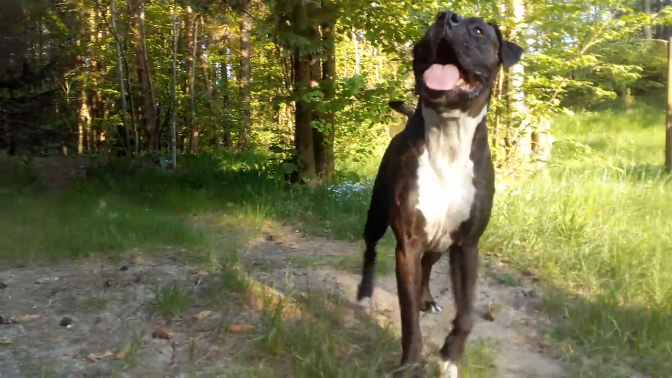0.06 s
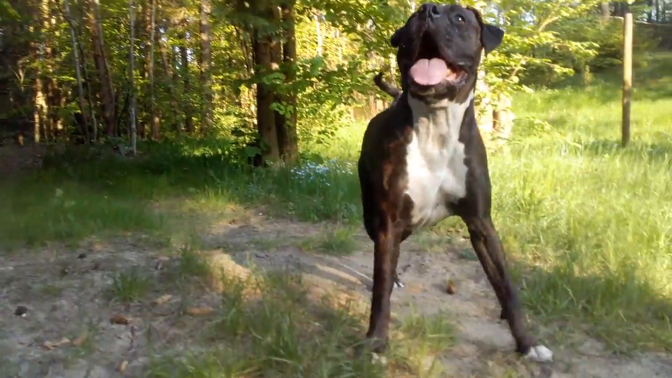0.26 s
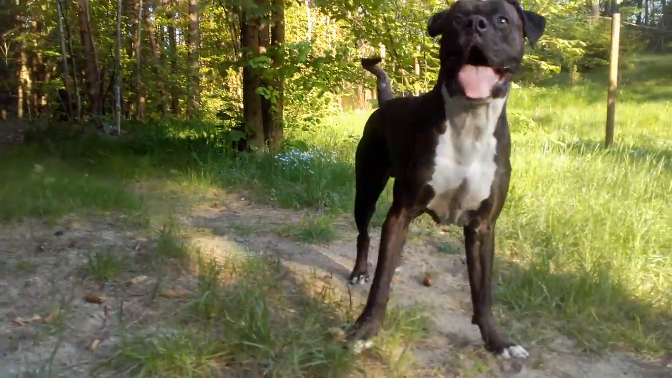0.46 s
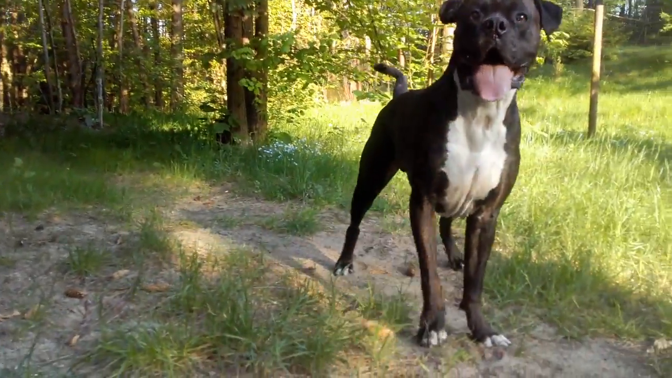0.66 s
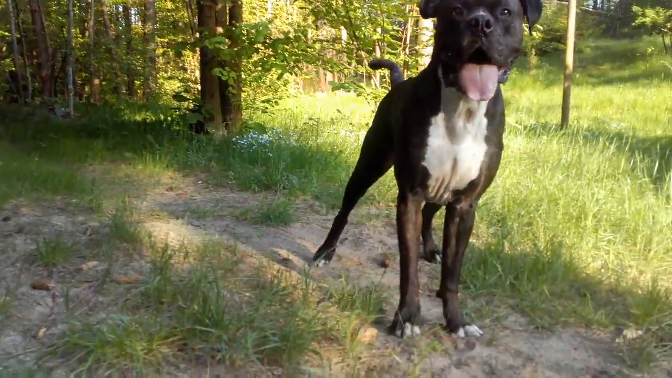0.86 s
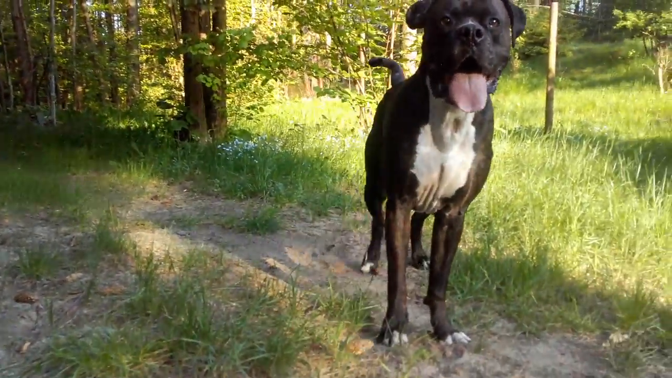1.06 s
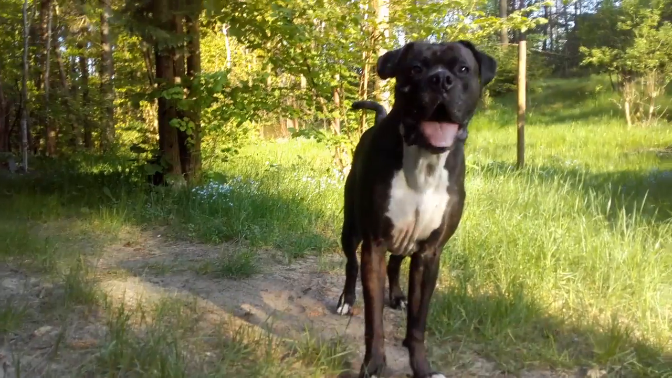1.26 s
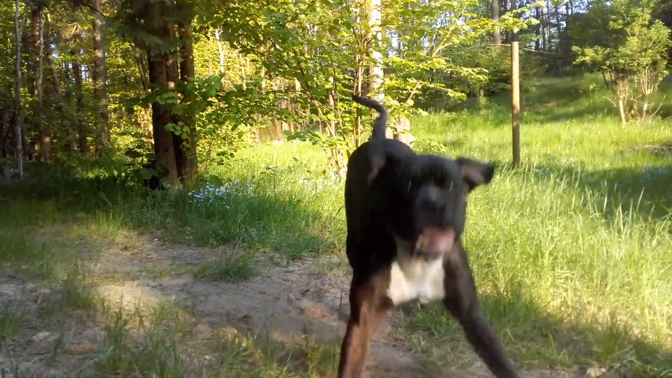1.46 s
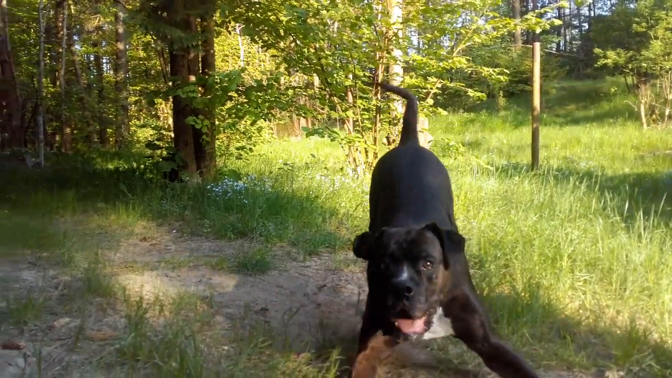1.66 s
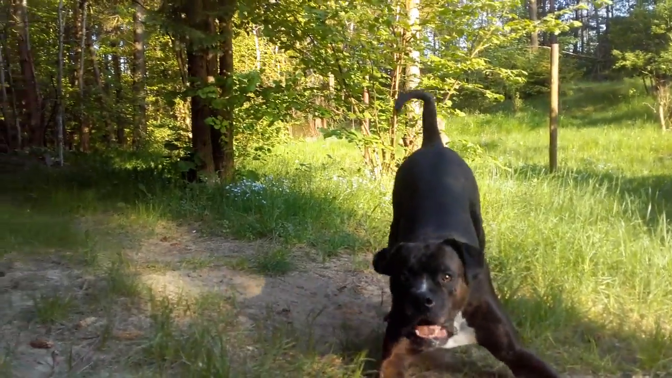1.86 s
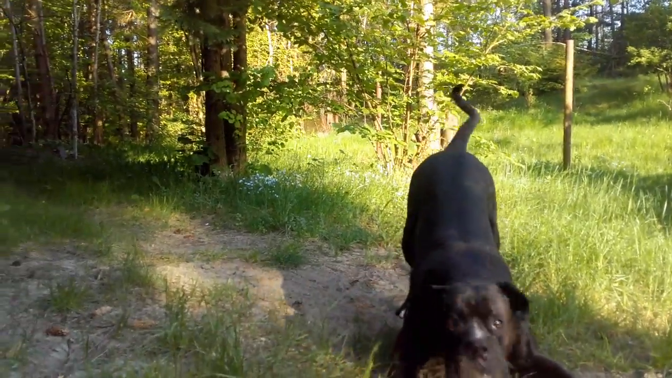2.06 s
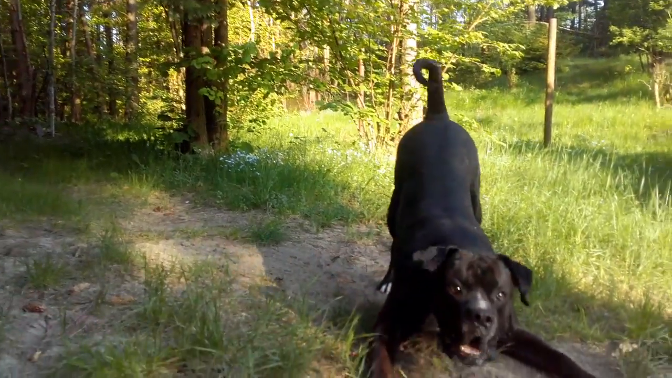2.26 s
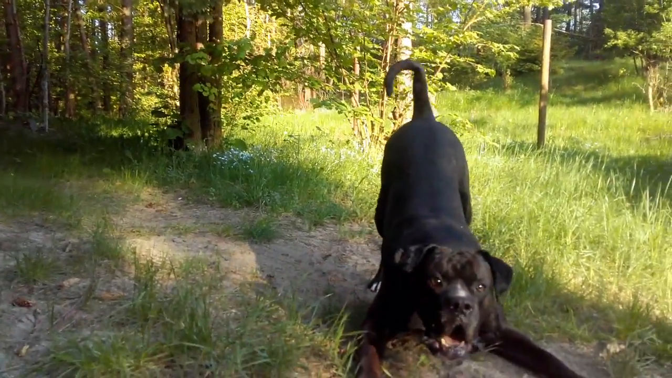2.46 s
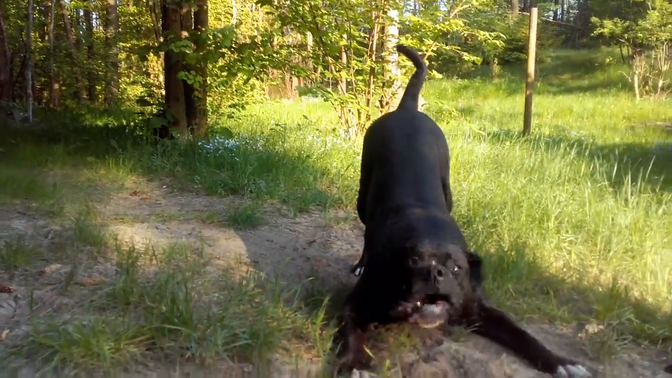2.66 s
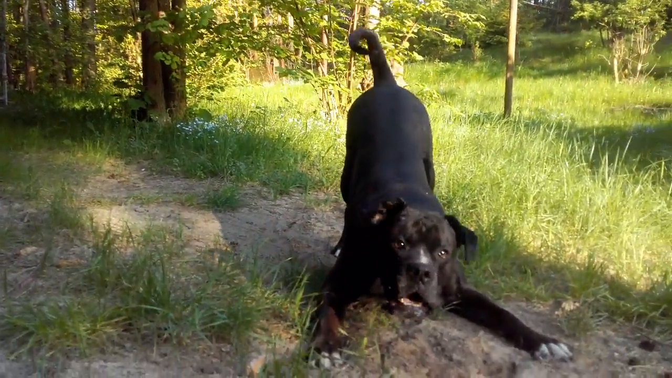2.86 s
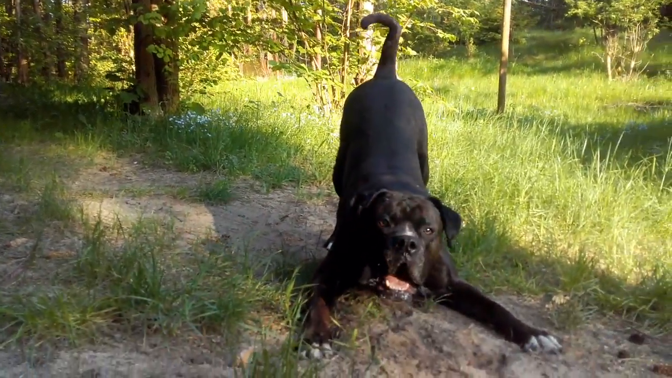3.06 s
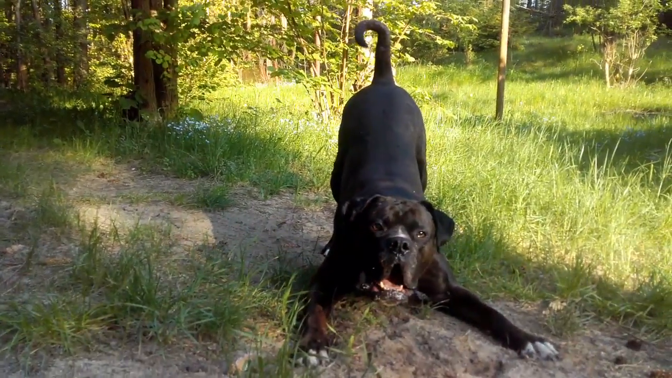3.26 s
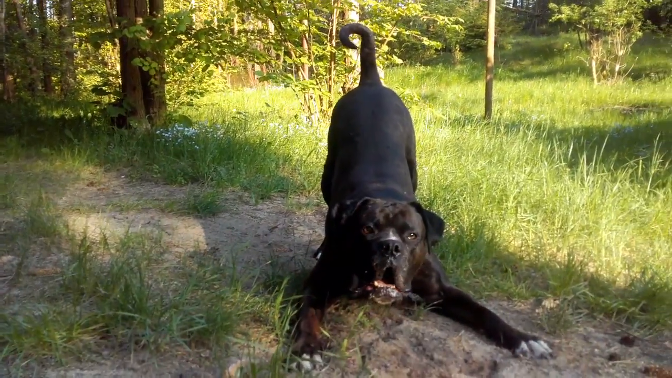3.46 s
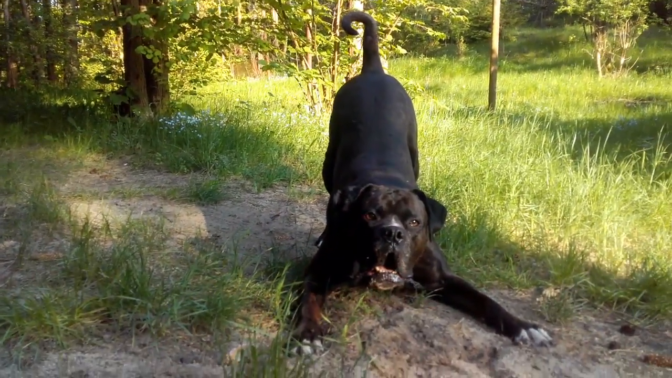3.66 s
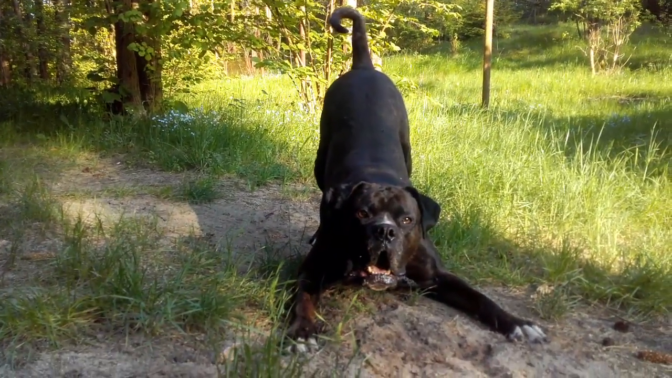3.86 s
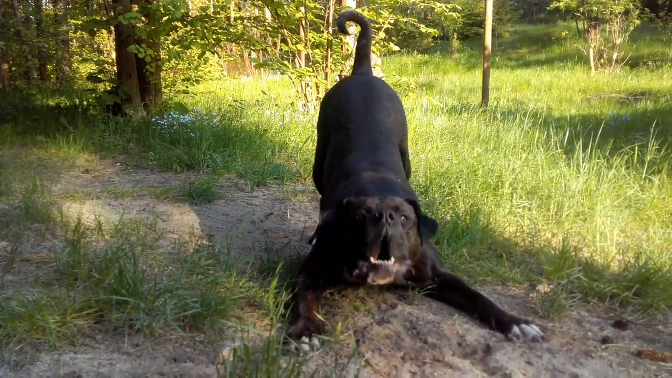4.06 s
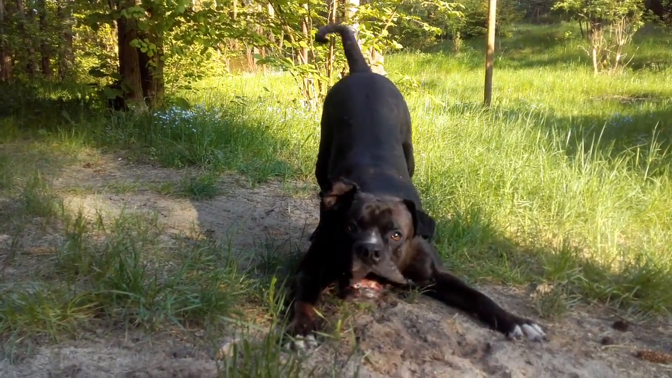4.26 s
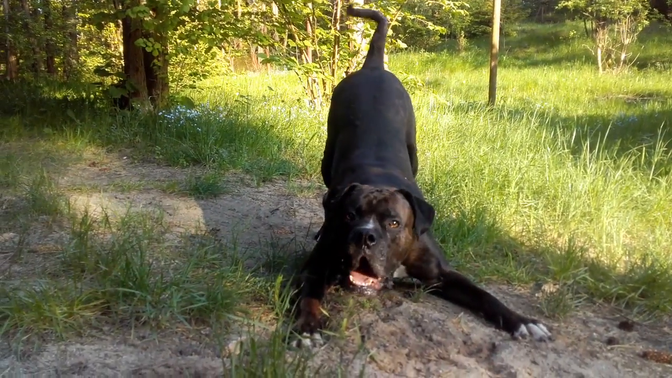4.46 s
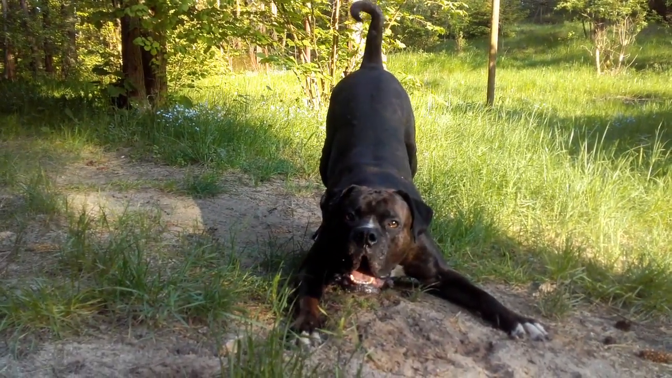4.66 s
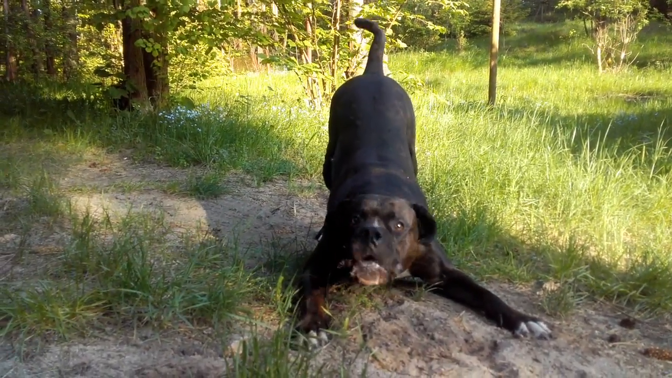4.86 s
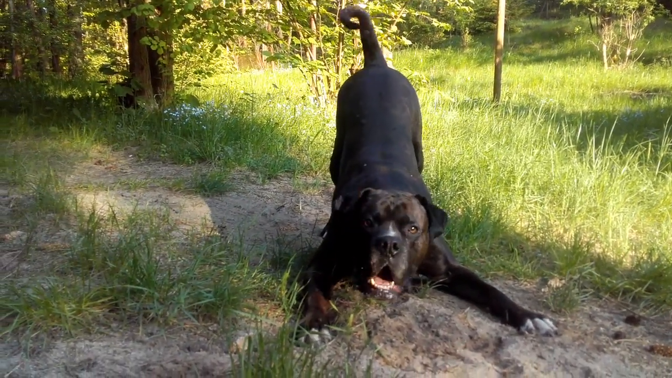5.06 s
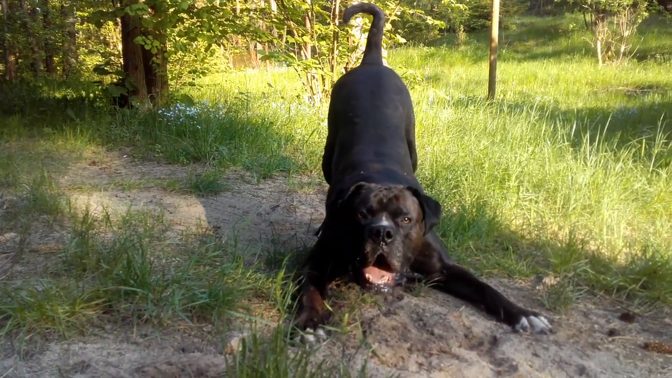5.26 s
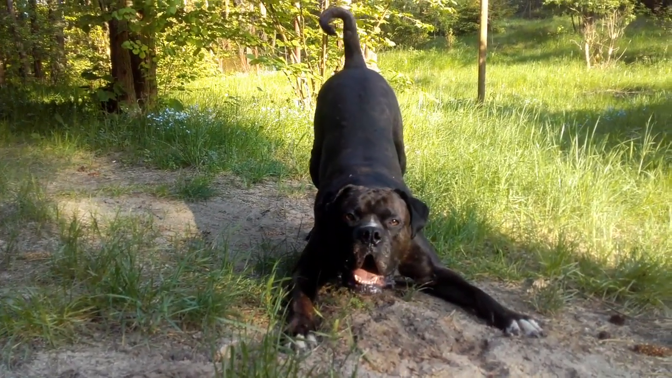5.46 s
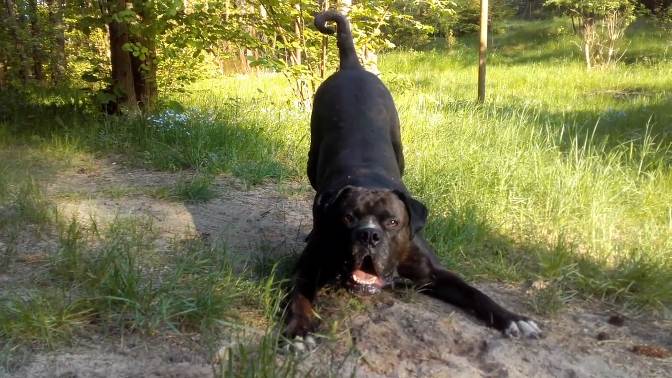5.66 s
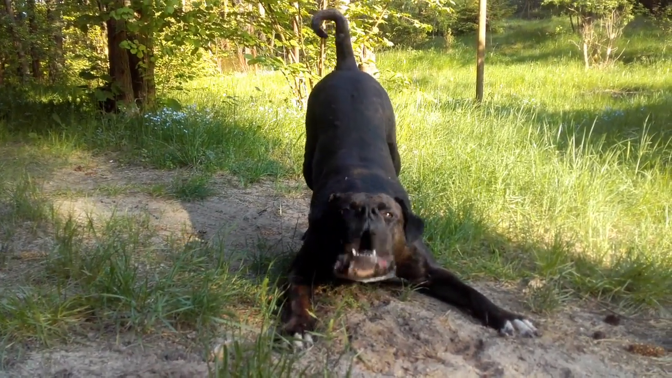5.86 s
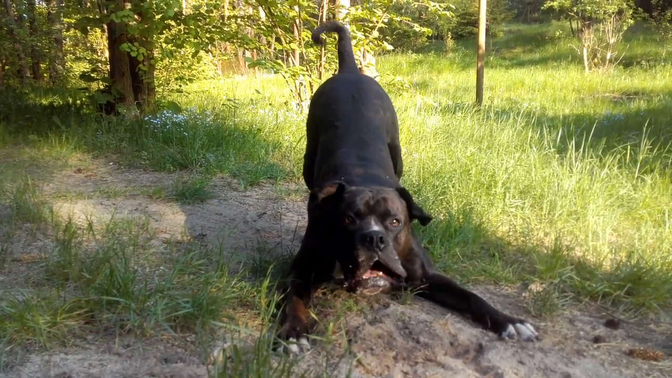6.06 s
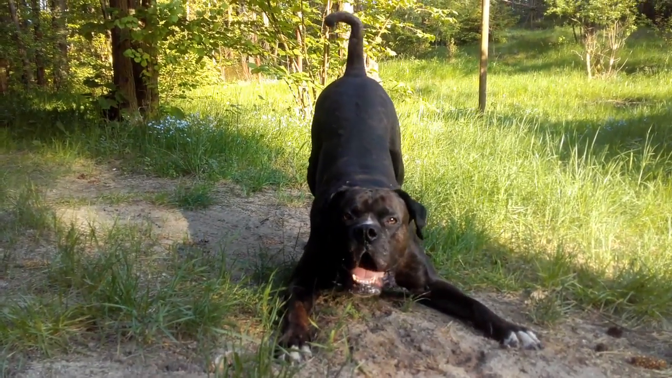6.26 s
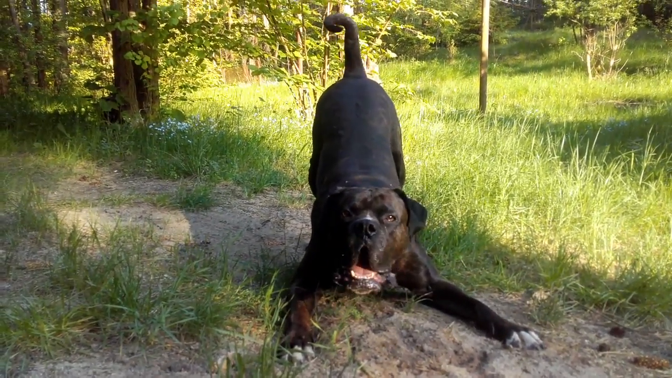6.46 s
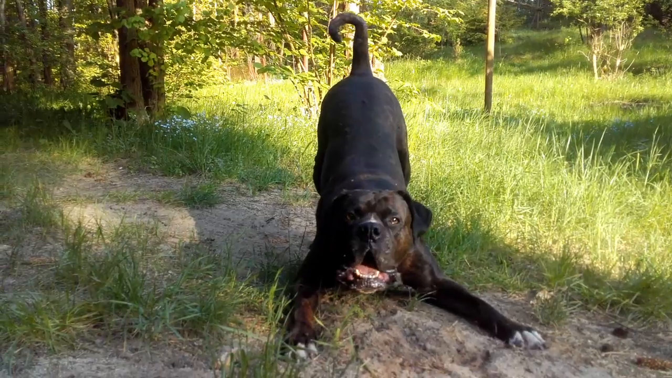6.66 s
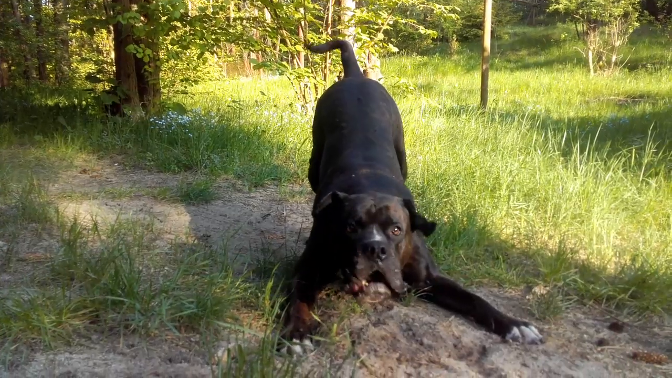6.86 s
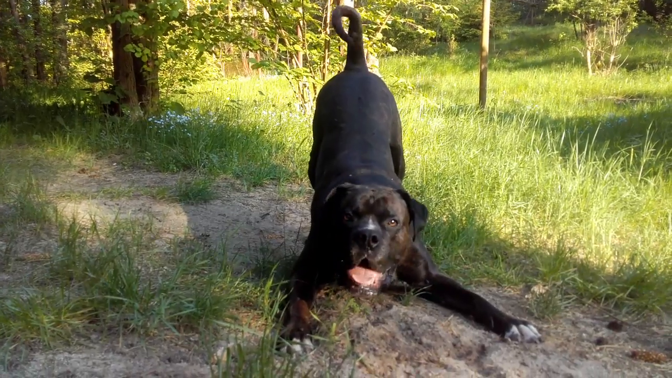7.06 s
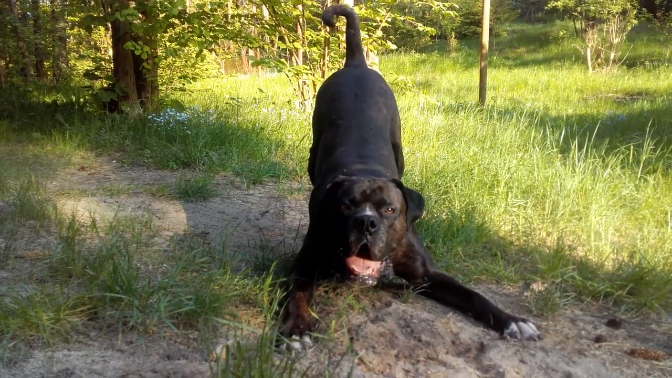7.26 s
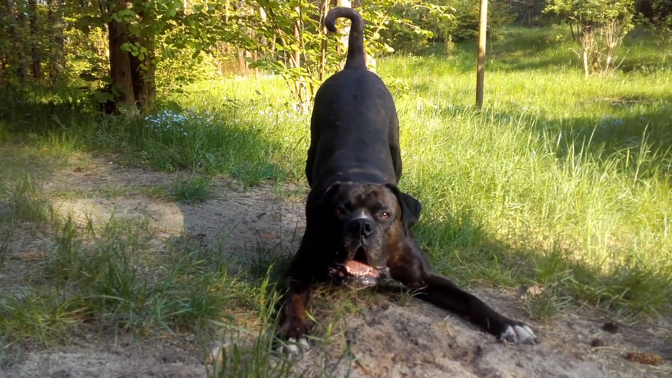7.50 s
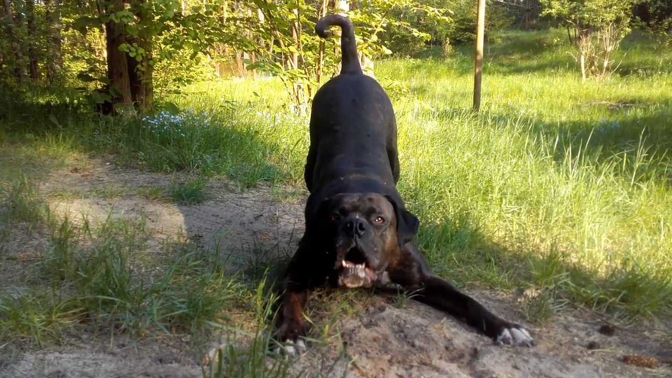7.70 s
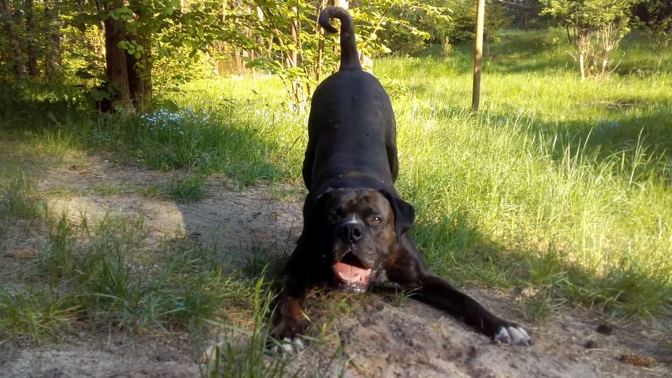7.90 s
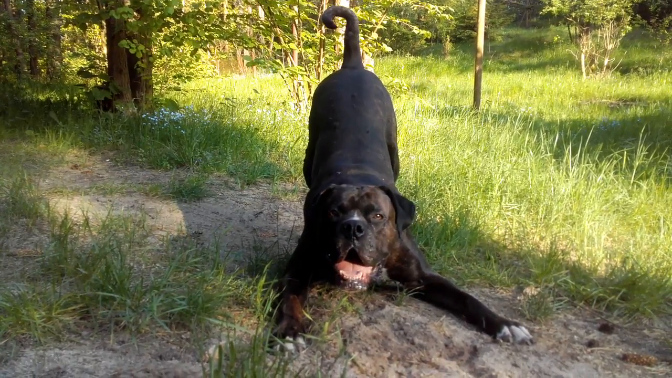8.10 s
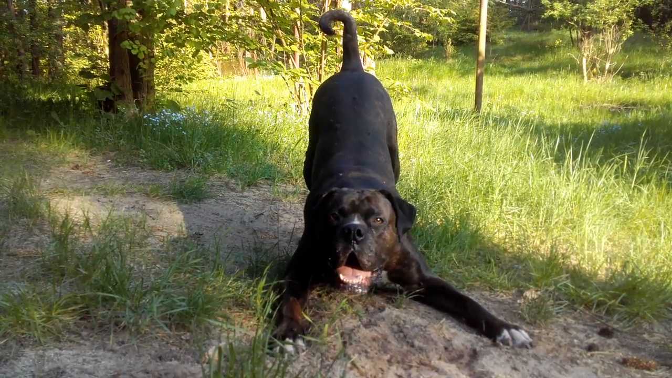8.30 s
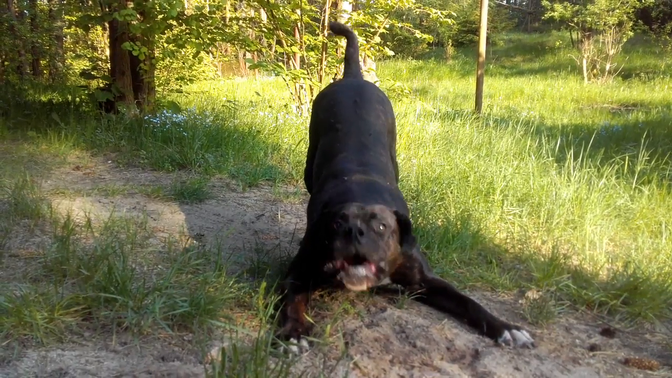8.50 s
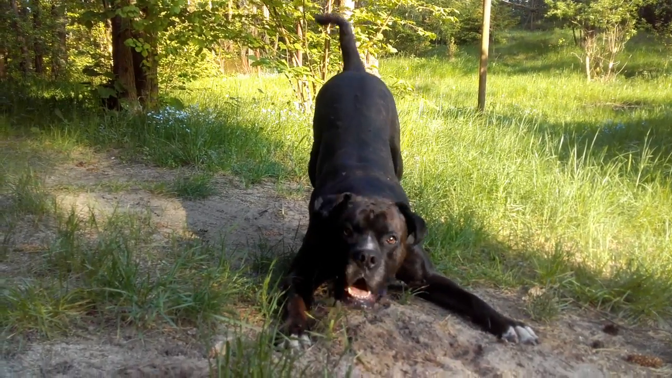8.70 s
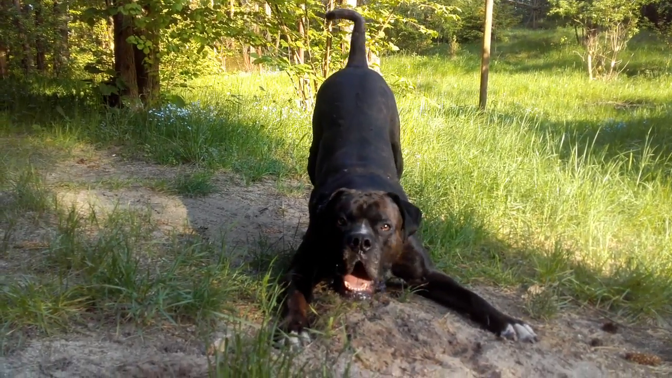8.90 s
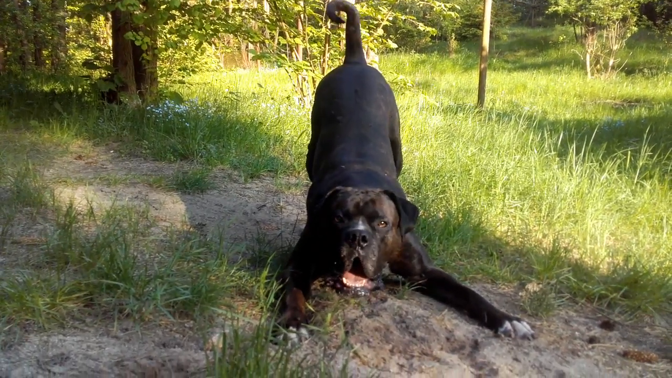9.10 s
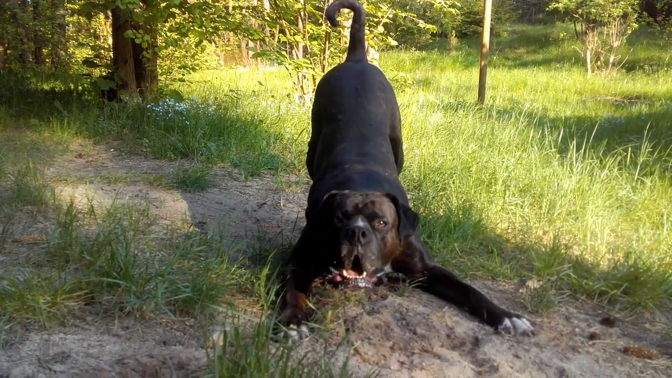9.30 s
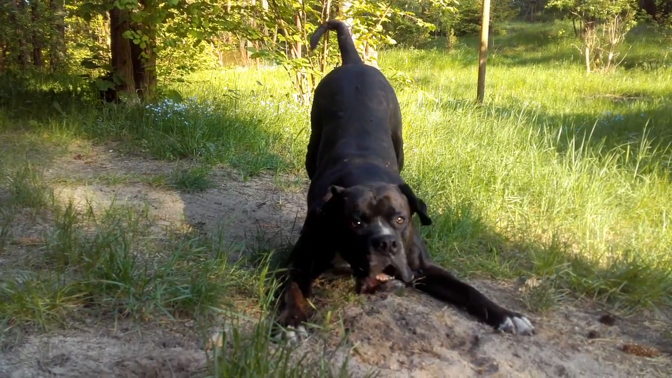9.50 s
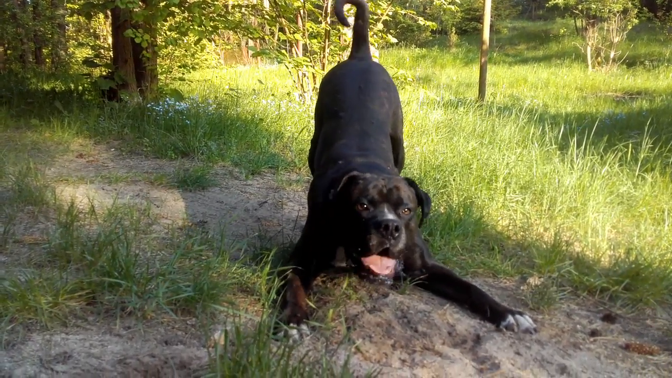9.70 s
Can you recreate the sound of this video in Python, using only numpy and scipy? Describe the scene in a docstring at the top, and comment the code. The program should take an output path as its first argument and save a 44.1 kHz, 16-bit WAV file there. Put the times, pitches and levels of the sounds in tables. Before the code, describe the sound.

A big dog pants softly three times close to the microphone while small birds whistle at a quiet forest edge. It lets out a growling woof, and its paws faintly skid and pat on sand. Eight loud, hoarse single barks follow at uneven intervals, with one lower woof late among them. Most barks start with a brief growl and end in a rush of breath, leaving a faint echo.

```python
"""A big dog barks close by at a forest edge, after panting and dropping onto its forelegs in the sand.
Most barks start as a growl; each breaks into a rough arch of pitch and ends in a rush of breath.
The voice is a source and a filter: vocal-fold pulses and turbulence excite the resonances of throat
and muzzle. Wet lips smack, small birds whistle over quiet air, and the trees return a faint echo."""
import sys
import numpy as np
from scipy import signal
from scipy.fft import rfft, irfft, next_fast_len
from scipy.io import wavfile
from scipy.ndimage import uniform_filter1d

SR = 44100
rng = np.random.default_rng(int(sys.argv[2]) if len(sys.argv) > 2 else 0)


def to_wav(s):
    """Save 16-bit WAV."""
    ch = np.atleast_2d(s).T  # columns
    pcm = np.round(np.clip(ch, -1, 1) * 32767)  # PCM
    wavfile.write(sys.argv[1], SR, pcm.astype(np.int16))


N = 429534
TIME = np.arange(N) / SR


def from_db(db):
    """Amplitude ratio of a level in decibels."""
    return 10 ** (np.asarray(db) / 20)


def rms_one(x):
    """Normalisation to unit power."""
    return x / np.sqrt(np.mean(x ** 2) + 1e-20)


def in_time(rows):
    """Linear interpolation of (time, values...) rows: one curve per value."""
    times, *columns = np.transpose(rows)
    return [np.interp(TIME, times, column) for column in columns]


def during(start, length):
    """Rectangular window: the samples of an event and its age at each."""
    on = (TIME >= start) & (TIME < start + length)
    return on, TIME[on] - start


def soften(levels, size=220):
    """Triangular smoothing: two moving averages of `size` samples."""
    return uniform_filter1d(uniform_filter1d(levels, size), size)


def hump(age, centre_s, half_width_s):
    """Gaussian bell of height one."""
    return np.exp(-((age - centre_s) / half_width_s) ** 2)


def puffs(events, rise_s):
    """Superposed envelopes of soft contacts: linear rise, exponential decay."""
    starts, peak_db = np.transpose(events)
    ages = np.clip((TIME - starts[:, None]) / rise_s, 0, 50)
    return from_db(peak_db) @ (ages * np.exp(1 - ages))


def band(x, hz, kind="band", order=4):
    """Butterworth filter, flat in its passband."""
    return signal.sosfilt(signal.butter(order, np.clip(hz, 10, .45 * SR), kind, fs=SR, output="sos"), x)


def noise():
    """White Gaussian noise."""
    return rng.standard_normal(N)


def drift(rate_hz):
    """Random modulation: low-passed noise of unit power."""
    return rms_one(band(noise(), rate_hz, "low", order=2))


def coloured(spectrum):
    """Spectral shaping: noise of unit power that follows (frequency, level) rows."""
    hz, db = np.transpose(spectrum)
    size = next_fast_len(N)
    shape = from_db(np.interp(np.log(np.fft.rfftfreq(size, 1 / SR) + 1), np.log(hz), db))
    return rms_one(irfft(rfft(noise(), size) * shape, size)[:N])


def resonate(x, modes):
    """Parallel resonances, each (frequency [Hz], bandwidth [Hz], gain [dB])."""
    return sum(from_db(db) * band(x, [hz - width / 2, hz + width / 2], order=2 if hz < 1000 else 3)
               for hz, width, db in modes)


def moving_resonance(hz, half_width_hz):
    """Narrowband noise: air ringing in a cavity whose tuning moves."""
    phase = 2 * np.pi * np.cumsum(hz) / SR
    return drift(half_width_hz) * np.sin(phase) + drift(half_width_hz) * np.cos(phase)


def thin(x, share, edge_hz):
    """Cancellation: subtracting a share of the bass, in phase, weakens it."""
    bass = signal.sosfiltfilt(signal.butter(4, edge_hz, fs=SR, output="sos"), x)
    return x - np.clip(share, 0, 1) * bass


def articulate(x, edges_hz, levels, even_s):
    """The mouth as a time-varying filter: each band is evened out, then given its own envelope."""
    out = 0
    for low, high, level in zip(edges_hz, edges_hz[1:], levels):
        part = band(x, [low, high], order=5)
        power = soften(part ** 2, int(even_s * SR))
        out = out + level * part / np.sqrt(np.abs(power) + 1e-12)
    return out


# Spectrum of the air: (frequency [Hz], relative level [dB])
AIR_SPECTRUM = [(18, -50), (30, -6), (164, -6), (256, -4.5), (332, -4), (420, -1.5), (945, -5), (1080, -6),
                (1230, -5), (3490, -18), (4420, -24.5), (5170, -27.5), (15500, -51.5)]
# Its rise and fall: (time [s], relative level [dB])
AIR_LEVELS = [(0, -53.5), (.7, -58.5), (1.25, -59.5), (2.5, -56.5), (3.3, -64), (3.9, -64.5), (4.6, -56.5),
              (5.6, -65), (6.5, -60.5), (7.3, -63), (8.3, -64), (9.25, -69), (9.74, -65.5)]


def air():
    """Ambient noise: a dark hush under slow amplitude modulation."""
    air_db, = in_time(AIR_LEVELS)
    return from_db(air_db - 4.5) * band(coloured(AIR_SPECTRUM), 64, "high", order=1)


# Bird notes: (start [s], length [s], first pitch [Hz], middle pitch [Hz], last pitch [Hz],
# level [dB], warble depth [Hz])
BIRD_NOTES = [(-.03, .17, 2305, 2206, 2276, -44.5, 64), (0.091, 0.042, 2400, 2730, 2500, -55, 130),
              (.15, 0.12, 2230, 2140, 2245, -57.5, 44), (0.273, 0.096, 2830, 3007, 3200, -53.5, 83),
              (0.329, 0.15, 3400, 3570, 3430, -62.5, 190), (0.381, 0.13, 3205, 2895, 2390, -49.5, 45),
              (0.515, 0.052, 7700, 7600, 7544, -83.5, 160), (0.974, .13, 3600, 3420, 3660, -69.5, 67),
              (3.018, 0.16, 3640, 3577, 3570, -76, 110), (3.218, 0.22, 4560, 4520, 4480, -77.5, 20),
              (3.721, 0.37, 4540, 4446, 4425, -75, 29), (4.423, 0.2, 2270, 2227, 2165, -48.5, 80),
              (4.456, 0.13, 3700, 3660, 3350, -68.5, 180), (4.682, 0.13, 2560, 2596, 2534, -51, 5.4),
              (4.81, .06, 1924, 1867, 1890, -51.5, 25), (5.081, 0.16, 2297, 2243, 2244, -48.5, 64),
              (5.223, 0.08, 2535, 2570, 2584, -46.5, 29), (5.384, 0.11, 2600, 2620, 2540, -63, 75),
              (5.546, 0.063, 1843, 1880, 2080, -51.5, 45), (5.631, .12, 2350, 2084, 2046, -52, 130),
              (5.831, 0.088, 3980, 3743, 3311, -69.5, 210), (6.032, 0.12, 3280, 3330, 3280, -56, 57.4),
              (6.253, 0.099, 7100, 6940, 7000, -76.5, 110), (6.396, 0.32, 3306, 3390, 3450, -74, 141),
              (7.269, 0.16, 2240, 2283, 2182, -66, 10.3), (7.474, 0.16, 3530, 3470, 3600, -76.5, 140),
              (8.828, .14, 3550, 3520, 3520, -71.5, 180)]


def birds():
    """Frequency modulation: each whistle is a pure tone that glides and warbles."""
    out, warble = np.zeros(N), drift(110)
    for start, length, *glide_hz, db, warble_hz in BIRD_NOTES:
        on, age = during(start, length)
        hz = np.interp(age / length, [0, .5, 1], glide_hz) + warble_hz * warble[on]
        envelope = from_db(db) * np.sqrt(np.abs(np.sin(np.pi * age / length)))
        out[on] += envelope * np.sin(2 * np.pi * np.cumsum(hz) / SR)
    return out


def forest(x, t60, dull_hz):
    """Reverberation by scattering: countless trunks spread a sound into a dull, decaying tail."""
    t = TIME[:2 * SR]
    scatter = rng.standard_normal(len(t)) * from_db(-60 * t / t60) * (1 - np.exp(-t / .0044))
    response = band(scatter / np.linalg.norm(scatter), dull_hz, "low", order=1)
    return signal.fftconvolve(x, response)[:N]


TAIL_S = .22   # time allowed for the fading tail
# Pants: (start [s], length [s], level [dB])
PANTS = [(-.01, 0.037, -44.5), (0.362, 0.13, -42), (0.816, 0.13, -49)]
# Their spectrum: (frequency [Hz], relative level [dB])
PANT_SPECTRUM = [(150, -59), (250, -50), (421, -21), (501, 1.5), (731, -12.5), (833, 2), (1020, -11),
                 (1340, -0.5), (1750, -17), (2080, -6.5), (2300, -12.5), (2900, -21.5), (4290, -46),
                 (8000, -55), (10400, -89), (17600, -120)]


def panting():
    """Flow noise: breath flutters over the tongue; each pant starts at once, sags and dies."""
    attack_s, sag_db_per_s, release_db_per_s = .008, 23.5, 294.5
    level = np.zeros(N)
    for start, length, db in PANTS:
        on, age = during(start, 2 * length + TAIL_S)
        fall_db = sag_db_per_s * age + release_db_per_s * np.maximum(age - length, 0)
        level[on] += np.minimum(age / attack_s, 1) * from_db(db - fall_db)
    return level * coloured(PANT_SPECTRUM) * from_db(1.1 * drift(60))


# Echo paths: (delay [s], gain [dB])
ECHOES = [(.034, -29.5), (.071, -31), (.118, -36)]


def tree_echoes(x):
    """Early reflections: the nearest trees return delayed, duller copies."""
    echoes = sum(from_db(db) * np.interp(TIME - delay, TIME, x, left=0) for delay, db in ECHOES)
    return band(echoes, 3500, "low", order=1)


def folds(pitch_hz, jitter, shimmer_db, breath, odd_db):
    """Glottal source: uneven closures, strong and weak in turn, with a puff of air in each cycle."""
    cycles = np.cumsum(pitch_hz * np.exp(jitter * drift(170))) / SR
    count = np.floor(cycles)
    # odd_db parts alternate pulses and also lowers them all against the breath
    size = from_db(shimmer_db * drift(320) + odd_db * (count % 2 - 5.5))
    pulses = np.diff(count, prepend=0) * size * np.sqrt(SR / pitch_hz)
    airflow = rms_one(np.exp(-3 * (cycles - count)) * noise())
    return pulses + breath * band(airflow, 490, "high", order=1)


# Formants of the slack throat and muzzle: (frequency [Hz], bandwidth [Hz], gain [dB])
SLACK_FORMANTS = [(175, 130, -8), (505, 230, 3), (860, 360, -1.5), (1157, 350, -16), (1719, 160, -11.5),
                  (1855, 180, -12.5), (2214, 170, -14.5), (2915, 810, -37.5), (4420, 600, -30),
                  (5400, 620, -31.5), (6500, 360, -39.5), (9600, 1200, -43), (13500, 3400, -54.5)]
# Growls, leading into a bark or alone as a woof: (start [s], swell time [s], sag time [s], swell [dB],
# then relative peak band levels: throat [dB], jaw [dB], mouth [dB], teeth hiss [dB])
GROWLS = [ (1.336, .01, .02, 7.5, -63.5, -49, -53.5, -82), (1.401, .076, .032, 29, -11.5, -17, -28, -53),
          (2.002, 0.071, 0.0056, 22.5, -19, -30.5, -36, -62),
          (4.096, .043, .003, 19, -23, -39.5, -49.5, -65.5),
          (4.866, 0.026, 0.0038, 12.5, -24.5, -39, -42, -71.5),
          (5.906, 0.036, .003, 11, -31.5, -52.5, -51, -67),
          (6.743, 0.033, 0.025, 17.5, -29.5, -47.5, -49.5, -75),
          (7.554, .18, .05, 28.5, -23.5, -57.5, -39.5, -72),
          (8.462, 0.079, 0.0025, 16.5, -28.5, -48, -50, -75),
          (9.296, 0.13, 0.0026, 25.5, -26.5, -43, -54, -94)]
# Share of the swell and sag in each band: (throat, jaw, mouth, teeth hiss) [ratio]
GROWL_SHARES = [1.0, 0.99, 1, .65]


def growls():
    """Pulse phonation: slack folds flap slowly, faster as the growl swells, and ring the formants."""
    slack_hz, tense_hz, sag_db_per_s = 58.1, 92, 170.5
    flaps, levels = [], np.zeros((len(GROWL_SHARES), N))
    for start, swell_s, sag_s, swell_db, *peak_db in GROWLS:
        flaps += [(start, slack_hz), (start + swell_s, tense_hz)]
        on, age = during(start, swell_s + sag_s)
        below_db = swell_db * np.maximum(1 - age / swell_s, 0)
        below_db += sag_db_per_s * np.maximum(age - swell_s, 0)
        levels[:, on] = from_db(np.c_[peak_db] - np.c_[GROWL_SHARES] * below_db)
    flap_hz, = in_time(flaps)
    throat, jaw, mouth, hiss = soften(levels)
    source = folds(flap_hz, jitter=.24, shimmer_db=3, breath=.45, odd_db=1.5)
    source = band(source, 2000, "low", order=2) + .66 * band(noise(), 1900, "high", order=2)
    # the chest tone goes as the jaw opens
    voice = thin(resonate(source, SLACK_FORMANTS), 1.7 * jaw / (throat + 1e-9), edge_hz=500)
    edges_hz = [110, 600, 1000, 1500, 3600, 15500]
    gains = [throat, jaw, from_db(-11) * jaw, mouth, hiss]
    return from_db(-4) * articulate(voice, edges_hz, gains, even_s=.05)


# Notches of the muzzle: (frequency [Hz], bandwidth [Hz], share removed [0-1])
ANTIRESONANCES = [(1417, 98, 0.4), (2480, 300, 0.4), (3590, 740, 0.7), (7600, 810, 0.4), (11600, 2000, 0.3)]


def muzzle(x):
    """Antiresonance: side cavities cut valleys into the spectrum of the voice."""
    for hz, width_hz, share in ANTIRESONANCES:
        x = x - share * band(x, [hz - width_hz / 2, hz + width_hz / 2], order=1)
    return x


# Forepaws skidding through sand: (time [s], level [dB])
SKID = [(1.45, -75.5), (1.466, -76), (1.5, -65), (1.624, -55), (1.662, -70), (1.72, -77)]
# Paws patting the ground: (time [s], relative peak level [dB])
PATS = [(1.735, -50), (1.772, -53.5), (1.803, -40.5), (1.86, -45), (1.92, -44)]


def paws():
    """Friction and impact: sand grains crackle under the skid, then the dog settles with soft pats."""
    skid_db, = in_time(SKID)
    skid = soften(from_db(skid_db) * (TIME >= SKID[0][0]) * (TIME <= SKID[-1][0]))
    sand = rms_one(band(noise() * from_db(4 * drift(900)), [5500, 13000], order=2))
    earth = rms_one(resonate(noise(), [(330, 270, -1.5), (1490, 300, -11)]))
    return skid * sand + from_db(-9) * puffs(PATS, rise_s=.012) * earth


# Air after each utterance: (start [s], length [s], hold [s], fall [dB],
# then relative band levels: throat [dB], jaw [dB], mouth [dB], teeth hiss [dB])
BREATHS = [ (1.508, 0.15, 0.081, 26, -35, -29, -31, -45), (2.219, .15, .01, 25, -30, -35.5, -38, -49.5),
           (2.884, 0.15, .005, 23, -39, -41.5, -43, -57), (4.315, 0.14, 0.026, 21, -34.5, -41.5, -38, -52),
           (5.062, 0.18, 0.0052, 26.5, -34.5, -43.5, -39, -55),
           (6.114, 0.17, 0.013, 25, -35.5, -45.5, -38.5, -56),
           (6.969, 0.17, 0.0081, 26, -35.5, -44, -39.5, -55),
           (7.767, 0.18, 0.035, 23, -42.5, -52.5, -43.5, -67),
           (8.698, .15, 0.0032, 25, -32.5, -41.5, -38.5, -53),
           (9.57, 0.15, 0.0067, 25.5, -35, -45.5, -41.5, -58.5)]
# Shape of the fall, 1 = even, more = late: (throat, jaw, mouth, teeth hiss) [exponent]
BREATH_BENDS = [1.5, 0.61, 1.1, 1.0]


def breaths():
    """Turbulence through formants: air rushes out, then the forest's echo lingers and fades."""
    first_hz, last_hz = 490, 730   # a resonance rises as the throat relaxes
    echo_fade_db_per_s = 61.5
    rises, levels = [], np.zeros((len(BREATH_BENDS), N))
    for start, length, hold_s, fall_db, *start_db in BREATHS:
        rises += [(start, first_hz), (start + length, last_hz)]
        on, age = during(start, length + TAIL_S)
        fallen = np.clip((age - hold_s) / (length - hold_s), 0, 1) ** np.c_[BREATH_BENDS]
        echo_fade_db = echo_fade_db_per_s * np.maximum(age - length, 0)
        levels[:, on] = from_db(np.c_[start_db] - fall_db * fallen - echo_fade_db)
    rise_hz, = in_time(rises)
    rush = rms_one(resonate(noise() * from_db(2.5 * drift(55)), SLACK_FORMANTS))
    rush += from_db(2) * moving_resonance(rise_hz, half_width_hz=26)
    edges_hz = [80, 800, 1500, 3600, 15500]
    return from_db(-2) * articulate(rush, edges_hz, soften(levels), even_s=.03)


# Barks, two pushes of the jaw with a catch between; times after the first count from the start:
# (start [s], length [s], attack time constant [s], first push [s], second push [s],
# first opening [ratio], second opening [ratio], catch depth [dB], relative level [dB], lips [dB],
# hiss [dB], pitch top [s], top pitch [Hz], pitch fall [s], early hoot [Hz], midway hoot [Hz],
# early hoot gain [dB], late hoot gain [dB])
BARKS = [ (2.071, 0.15, 0.009, 0.044, 0.098, 1.43, 1.23, 3.5, 1, -5, -0.8, .092, 379.6, .062, 460, 400, 5.5, 2.5),
         (2.712, 0.18, .016, 0.051, 0.11, 1.15, .35, 5.5, -0.2, -3.8, -0.5, .105, 396, .045, 443, 415, 6.5, -13),
         (4.142, 0.17, 0.015, 0.048, 0.12, 0.88, 1.2, 6, 1.1, -1.4, 0, .097, 399.6, .042, 498, 425, 13.5, -1.5),
         (4.894, 0.17, 0.0073, 0.033, .11, .8, .9, 6.5, -1, 2.5, -2.3, .086, 397.3, .047, 480, 420, 6, -5),
         (5.947, .169, 0.017, 0.05, 0.11, 1.01, 0.38, 10, .1, 3.5, -2.1, .104, 398.8, .04, 468, 445, 8, -2),
         (6.8, .172, .008, .039, .105, .8, .5, 9.5, -0.16, -0.7, -2, .105, 406.7, .042, 480, 448, 8.5, -2),
         (8.534, 0.17, .014, 0.049, 0.12, 0.84, 0.89, 9.5, -0.5, 0.5, -1.5, .095, 390.2, .042, 503, 490, 10.5, -7.5),
         (9.407, 0.16, 0.013, 0.05, 0.12, 0.65, 1.25, 6, -1, -1.5, -3, .096, 369.2, .055, 485, 445, 10.5, 0.5)]
# Formants of the tense throat and muzzle: (frequency [Hz], bandwidth [Hz], gain [dB])
TENSE_FORMANTS = [(456.8, 268, 3), (675, 340, -6.5), (1031, 57, -8), (1262, 130, -9.5), (1653, 81, -20.5),
                  (2018, 410, 5.5), (2235, 30, -14), (2940, 620, -48.5), (4600, 560, -41),
                  (5300, 1800, -26), (6450, 400, -50.5), (9340, 810, -36.5), (14800, 2000, -63.5)]
# Edges of the bark's seven bands: (frequency [Hz])
BARK_EDGES_HZ = [130, 600, 1000, 1550, 2700, 3900, 12000, 15700]


def barks():
    """Source and filter: a hoarse pitch arch excites the formants, and a hoot rides on the lowest."""
    pitch_hz, rough, hoot_hz, hoot_db = bark_tuning()
    pulses = folds(pitch_hz, jitter=.07 * rough, shimmer_db=5 * rough,
                   breath=1.3 * rough, odd_db=4 * rough)
    # higher up, turbulence takes over, ringing in a mouth cavity that follows the pitch
    cavity = moving_resonance(4300 + 8 * (pitch_hz - 240), half_width_hz=370)
    turbulence = band(noise() * from_db(4.6 * drift(240)), 3200, "high", order=2)
    source = band(pulses, 3200, "low", order=2) + turbulence + from_db(-10) * cavity
    voice = band(resonate(source, TENSE_FORMANTS), 150, "high", order=3)
    voice = thin(voice, (pitch_hz - 260) / 90, edge_hz=370)   # tense folds lose their bass
    voice += hoot(voice, hoot_hz, hoot_db)
    return from_db(-1.5) * articulate(voice, BARK_EDGES_HZ, bark_levels(), even_s=.021)


def hoot(voice, hz, gain_db):
    """Biphonation: a second, nearly pure oscillation of the throat, as strong as the voice allows."""
    phase = 2 * np.pi * np.cumsum(hz * (1 + .02 * drift(110))) / SR
    tone = np.sin(phase) + from_db(-17) * np.sin(2 * phase) + from_db(-14.5) * np.sin(3 * phase)
    flutter_db = 1.5 * drift(70)
    bass_power = uniform_filter1d(band(voice, 510, "low") ** 2, int(.0089 * SR))
    return 1.4 * np.sqrt(np.abs(bass_power)) * tone * from_db(gain_db + flutter_db)


def bark_tuning():
    """Fold tension sets pitch: it climbs, clearing, and drops fast; the hoot's pitch sags and rises."""
    start_hz, fallen_hz, end_hz = 251.94, 270.2, 232.54
    slack_rough, tense_rough, falling_rough = .5, .32, .4
    hoot_end_hz, hoot_swell_s, hoot_fade_s = 508.3, .027, .075
    arch, hoots = [], []
    for start, length, *_, top_s, top_hz, fall_s, early_hz, mid_hz, early_db, late_db in BARKS:
        end = start + length
        arch += [(start, start_hz, slack_rough),
                 (start + top_s, top_hz, tense_rough),
                 (min(start + top_s + fall_s, end), fallen_hz, falling_rough),
                 (end + .005, end_hz, falling_rough)]
        hoots += [(start, early_hz, early_db - 2.5),
                  (start + hoot_swell_s, (early_hz + mid_hz) / 2, early_db),
                  (start + hoot_fade_s, mid_hz, late_db),
                  (start + top_s + fall_s / 2, mid_hz, late_db),
                  (end, hoot_end_hz, late_db)]
    return in_time(arch) + in_time(hoots)


# Response of each band to the jaw, low to high: (relative level [dB], lift by first push [dB],
# lift by second push [dB], change as the mouth shuts [dB])
JAW_RESPONSE = [(-6.5, -7.5, -4, -14.5), (-19.5, -5, 7.5, -16), (-29, 10, 7, -19), (-31.5, 3.5, 5.5, -12.5),
                (-58.5, -3, 1.5, 4), (-52, 6, -1, 0), (-73, -3, -3.5, -9.5)]


def bark_levels():
    """Mouth opening sets each band's gain: a quick attack, two pushes around a catch, then closure."""
    attack_db, closing_power = 21.5, 2.38
    levels = np.zeros((len(JAW_RESPONSE), N))
    rest_db, first_db, second_db, shut_db = np.transpose(JAW_RESPONSE)[:, :, None]
    for (start, length, attack_s, first_s, second_s, first_opening, second_opening,
         catch_db, level_db, lips_db, hiss_db, *_) in BARKS:
        on, age = during(start, length)
        catch = hump(age, (first_s + second_s) / 2, half_width_s=.012)
        effort_db = level_db - attack_db * np.exp(-age / attack_s) - catch_db * catch
        jaw_db = first_opening * first_db * hump(age, first_s, half_width_s=.024)
        jaw_db += second_opening * second_db * hump(age, second_s, half_width_s=.016)
        db = rest_db + effort_db + jaw_db + shut_db * (age / length) ** closing_power
        db[3] += lips_db   # 1550-2700 Hz
        db[-2:] += hiss_db   # above 3900 Hz
        levels[:, on] = from_db(db)
    return soften(levels)


# Wet lips smacking against the teeth: (time [s], relative peak level [dB])
SMACKS = [(2.1046, -51), (2.221, -55.5), (2.7581, -54.5), (4.1679, -55.5), (4.2134, -48.5), (4.2976, -52.5),
          (4.9963, -51), (5.9517, -65), (5.9954, -48), (6.801, -63.5), (6.8809, -51.5), (6.9481, -56),
          (6.997, -44), (7.6876, -60), (8.5484, -54.5), (8.5897, -47.5), (8.6827, -53), (8.7242, -52)]


def smacks():
    """Cavity resonance: spits of saliva ring in the narrow gap between lips and teeth."""
    spray = resonate(noise(), [(5400, 1800, -5), (9064, 1300, -1)])
    return from_db(-10.5) * puffs(SMACKS, rise_s=.0044) * rms_one(spray)


def scene():
    """Superposition: the dog close by, its reflections, birds deep among the trees and quiet air."""
    dog = muzzle(barks() + growls() + breaths()) + smacks() + panting() + paws()
    near_trees = from_db(-34.5) * forest(dog, t60=.13, dull_hz=4000)
    deep_forest = from_db(-41.5) * forest(dog, t60=1.4, dull_hz=2000)
    song = birds()
    song += from_db(-1.5) * forest(song, t60=.93, dull_hz=5930)
    return (dog + tree_echoes(dog) + near_trees + deep_forest + song + air())[None]


def record(dry):
    """Nonlinear distortion: a square term adds a faint deep flutter, peaks saturate, the top is cut."""
    cutoff_hz = 15800
    bent = dry + from_db(-21.5) * band(dry ** 2, 65, "low", order=1)
    rounded = 1.728 * np.tanh(bent / 1.36)
    return signal.sosfilt(signal.ellip(10, .1, 80, cutoff_hz, fs=SR, output="sos"), rounded)


dry = scene()
out = record(dry)
to_wav(out)
```